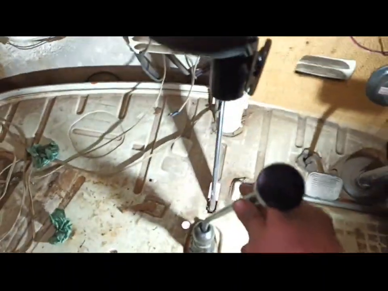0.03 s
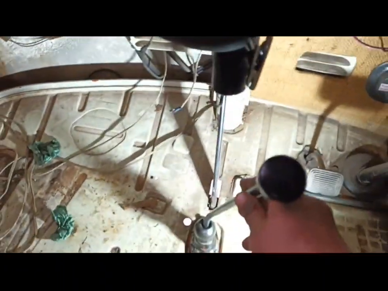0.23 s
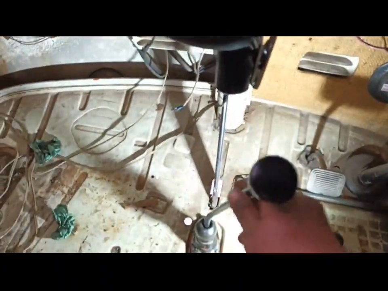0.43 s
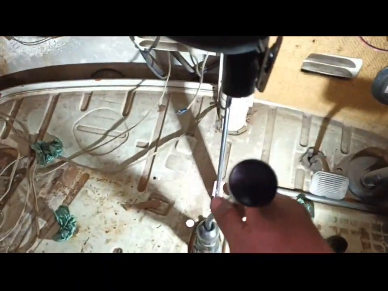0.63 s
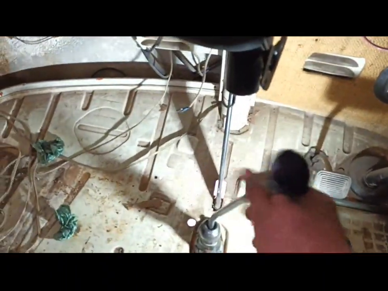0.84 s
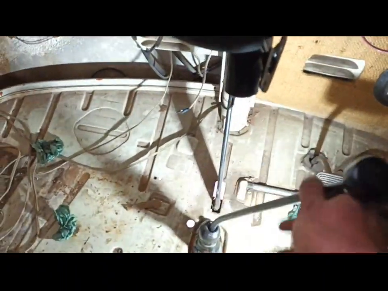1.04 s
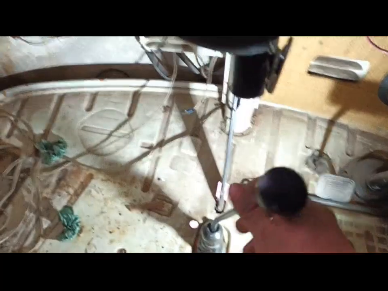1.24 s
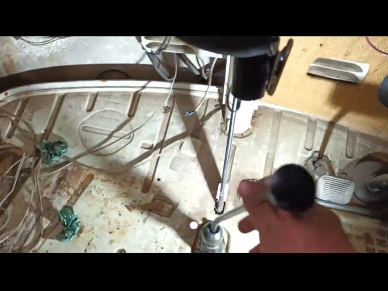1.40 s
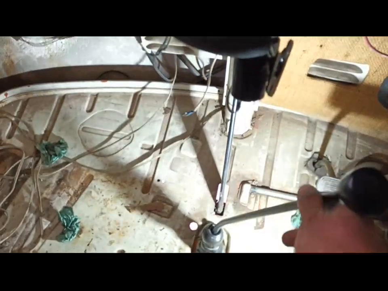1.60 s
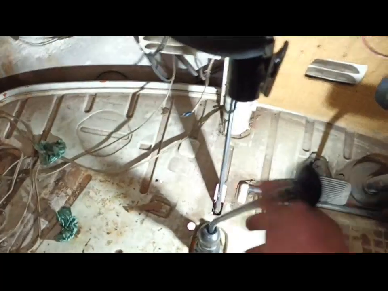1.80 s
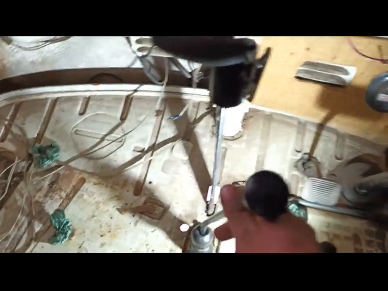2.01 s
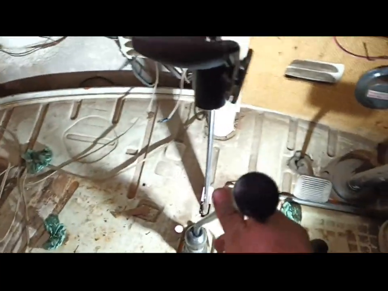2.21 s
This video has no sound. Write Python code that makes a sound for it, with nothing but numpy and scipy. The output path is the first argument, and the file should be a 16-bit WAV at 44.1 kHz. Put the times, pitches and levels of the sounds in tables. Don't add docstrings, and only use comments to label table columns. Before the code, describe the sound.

Hard metallic clunks of a hand-thrown gear shifter, with hollow floor-pan knocks and low body thumps

```python
import sys
import numpy as np
from scipy import signal
from scipy.io import wavfile

SR = 44100
rng = np.random.default_rng(int(sys.argv[2]) if len(sys.argv) > 2 else 0)


def amplitude_ratio(level_db):
    exponent = np.asarray(level_db, float) / 20
    return 10 ** exponent


def wav_out(sig):
    wavfile.write(sys.argv[1], SR, np.round(np.clip(np.atleast_2d(sig).T, -1, 1) * 32767).astype(np.int16))


N = 99269


def in_time(rows):
    return np.interp(np.arange(N) / SR, *np.transpose(rows))


def at_hz(points, hz):
    point_hz, db = np.transpose(points)
    return np.interp(np.log(hz), np.log(point_hz), db)


def band_pass(x, order, low_hz, high_hz):
    return signal.sosfilt(signal.butter(order, [low_hz, high_hz], "band", fs=SR, output="sos"), x)


def ring(push, hz, t60_s):
    radius, turn = amplitude_ratio(-60 / (t60_s * SR)), 2 * np.pi * hz / SR
    feedback = [1, -2 * radius * np.cos(turn), radius * radius]
    return signal.lfilter([0, np.sin(turn)], feedback, push + 1e-18)


def stereo(pair, hz):
    # (frequency [Hz], level [dB])
    side_level = [(60, -34.5), (110, -5), (200, -12.5), (380, -7), (700, -4.5), (1290, 3), (2380, 0),
                  (4400, 1), (8120, -4), (15000, -14)]
    # (frequency [Hz], level [dB])
    lean = [(60, 0), (110, 1), (200, -2), (380, 1.5), (700, -1), (1290, -1.5), (2380, -0.5), (4400, 1.5),
            (8120, 3), (15000, 3.5)]
    signs = np.array([[1], [-1]])
    left_right = pair[0] + amplitude_ratio(at_hz(side_level, hz)) * pair[1] * signs
    return left_right * amplitude_ratio(at_hz(lean, hz) / 2 * signs)


def bands(low_hz, high_hz, gain):
    edges_hz = low_hz * 2 ** np.arange(0, np.log2(high_hz / low_hz) + 0.01, 1 / 5)
    white = rng.standard_normal((2, 2, N + SR // 10))
    out = 0
    for k, (low, high) in enumerate(zip(edges_hz, edges_hz[1:])):
        hz = np.sqrt(low * high)
        noise = band_pass(white[k % 2], 3, low, high)[:, -N:]
        out = out + gain(hz) * stereo(noise, hz)
    return out


def steady(spectrum, low_hz, high_hz):
    x = bands(low_hz, high_hz, lambda hz: amplitude_ratio(at_hz(spectrum, hz)))
    return x / x.std()


def rumble(gate_db):
    # (frequency [Hz], density [dB per Hz])
    spectrum = [(18, -58), (30, -23), (76, -5), (182, -15), (259, -13), (353, -20.5), (385, -17),
                (1000, -34.5), (1300, -64), (2200, -120)]
    level_db, follows = -50, 0.82
    return amplitude_ratio(level_db + follows * gate_db) * steady(spectrum, 30.2, 970)


def hiss():
    # (time [s], level [dB])
    opening = [(0.0, -75.5), (0.01, -80.5), (0.36, -82), (0.41, -62), (0.59, -88), (0.68, -86),
               (0.78, -62.5), (0.91, -66), (1.03, -90), (1.05, -68.5), (1.13, -65), (1.22, -86),
               (1.68, -89), (1.69, -67), (1.94, -80.5), (1.95, -78), (2.0, -89), (2.25, -81.5)]
    # (frequency [Hz], density [dB per Hz])
    spectrum = [(530, -46), (900, 1), (1320, 1), (3700, -3), (4710, -1.5), (8270, -10.5), (10100, 2),
                (13500, -15), (15800, -2.5)]
    level_db = 10
    return amplitude_ratio(in_time(opening) + level_db) * steady(spectrum, 792.6, 17900)


def palm_slides():
    # (time [s], length [s], level [dB])
    slips = [
        (1.335, 0.18, -67),
        (1.635, 0.14, -61.5),
    ]
    # (frequency [Hz], density [dB per Hz])
    spectrum = [(900, 2.5), (8000, -12.5), (10200, -1), (16000, -23)]
    t = np.arange(N) / SR
    swell = 0
    for start_s, length_s, db in slips:
        swell = swell + amplitude_ratio(db) * np.sin(np.pi * np.clip((t - start_s) / length_s, 0, 1)) ** 2
    return swell * steady(spectrum, 1020, 16600)


def shell_boom():
    # (time [s], upper boom level [dB], lower boom level [dB], length [s])
    shoves = [(0.413, -44, -42, 0.034), (0.468, -48, -34.5, 0.054), (0.762, -51, -57, .02),
              (0.796, -21, -35, 0.052), (0.858, -22, -20, 0.024), (1.049, -34, -40.5, 0.024),
              (1.133, -21, -27, 0.01), (1.174, -47, -33, 0.038), (1.473, -31, -52, 0.015),
              (1.545, -39, -49.5, 0.013), (1.689, -29.5, -59, 0.01), (1.775, -27, -27.5, 0.014),
              (2.218, -57, -34, 0.033)]
    # (frequency [Hz], t60 [s], level [dB], shove column driving it [index])
    booms = [(114, .6, 0, 1), (62, .3, 0, 2), (101, .3, -11, 1), (127, .3, -11, 1), (53, .3, -5, 2),
             (82, .25, -8, 2)]
    drive_db, side_db = 9, -5
    t = np.arange(N) / SR
    phase = rng.uniform(0, 2 * np.pi, (len(shoves), len(booms), 2, 1))
    out = 0
    for k, (hz, t60_s, db, column) in enumerate(booms):
        push = np.zeros((2, N))
        for shove, start_phase in zip(shoves, phase):
            start_s, length_s = shove[0], shove[3]
            i = int(start_s * SR)
            u = t[:int(min(length_s * SR, N - start_s * SR))]
            swell = np.sin(np.pi * u / length_s) ** 2 / (length_s * SR)
            wave = np.sin(2 * np.pi * hz * u + start_phase[k])
            push[:, i:i + len(u)] += amplitude_ratio(shove[int(column)] + db + drive_db) * swell * wave
        out = out + stereo(ring(push, hz, t60_s) * amplitude_ratio(np.array([[0], [side_db]])), hz)
    return out


def stop_ticks():
    # (time [s], frequency [Hz], level [dB])
    splashes = [
        (1.318, 2740, -48.5),
        (1.695, 10200, -39),
        (1.736, 4360, -45.5),
        (1.943, 14700, -60),
    ]
    t60_s, half_width_hz = 0.05, 900
    u = np.arange(SR // 10) / SR
    out = np.zeros((2, N))
    for (start_s, hz, db), noise in zip(splashes, rng.standard_normal((len(splashes), 2, len(u)))):
        i = int(start_s * SR)
        burst = noise * amplitude_ratio(db + 9 - 60 * u / t60_s)
        out[:, i:i + len(u)] += stereo(band_pass(burst, 2, hz - half_width_hz, hz + half_width_hz), hz)
    return out


def stop_cracks():
    # (time [s], peak level [dB], extra sizzle near 10 kHz [dB], t60 at 3 kHz [s])
    hits = [(0.401, -38.5, -41, 0.17), (0.72, -52, -6, 0.15), (0.7672, -44, -13, 0.1),
            (0.8127, -18.5, -32, 0.16), (1.0363, -30.5, -22, 0.17), (1.086, -28, -18.5, 0.17),
            (1.1332, -31, -30, 0.18), (1.3187, -29, -64, 0.11), (1.628, -51.5, -15.5, 0.41),
            (1.69, -34, -38, 0.071), (1.696, -20, -20.5, 0.19), (1.884, -45.5, 4, 0.076),
            (1.943, -39.5, -17, 0.19)]
    # (frequency [Hz], density [dB per Hz])
    spectrum = [(530, -29), (900, -3.5), (1300, -9), (2720, -12.5), (7680, -30.5), (9860, -20.5),
                (13400, -38.5), (15500, -52)]
    level_db, t60_slope, rise_s = -6.5 + 15.5, 0.5, 0.00069
    sizzle_hz, sizzle_level_db = 10800, 15.5
    t = np.arange(N) / SR

    def gain(hz):
        out = np.zeros(N)
        sizzle_share = np.clip(np.log2(hz / sizzle_hz) + 1, 0, 1)
        for start_s, db, sizzle_db, t60_s in hits:
            i = int(start_s * SR)
            u = t[:min(SR // 3, N - i)]
            lift_db = (sizzle_db + sizzle_level_db) * sizzle_share
            decay_db = 60 * u / t60_s * (hz / 3000) ** t60_slope
            out[i:i + len(u)] += amplitude_ratio(db + lift_db - decay_db) * np.minimum(u / rise_s, 1)
        return out * amplitude_ratio(level_db + at_hz(spectrum, hz))

    return bands(972.6, 17900, gain)


def rod_slams():
    # (time [s], peak level [dB], frequency [Hz])
    pulses = [
        (1.1518, -16, 450),
        (1.1655, -16.5, 380),
        (1.775, -20, 433),
        (1.7885, -19.5, 355),
    ]
    t = np.arange(N) / SR
    out = np.zeros(N)
    for k, (start_s, db, hz) in enumerate(pulses):
        square = (np.pi * hz * (t - start_s)) ** 2
        out += (-1) ** k * amplitude_ratio(db) * (1 - 2 * square) * np.exp(-square)
    return out


def linkage_rings():
    # (time [s], frequency [Hz], level [dB], t60 [s])
    parts = [(.379, 633, -47.5, 0.054), (.392, 112.9, -37, 0.87), (.406, 246.3, -37, 0.19),
             (.413, 481.3, -41.5, .2), (.413, 656, -36, 0.09), (.402, 1084, -58, 0.19),
             (.718, 819.5, -38, 0.13), (.718, 1113, -39.5, 0.057), (.722, 489, -43.5, 0.29),
             (.767, 633, -27, 0.073), (.79, 610, -37.5, 0.085), (.787, 250, -29, .12),
             (.815, 354.6, -28, 0.18), (.835, 633, -33, 0.1), (.865, 267.2, -25, 0.13),
             (.872, 120, -28, 0.11), (1.039, 537, -28, 0.049), (1.039, 1058, -44, 0.18),
             (1.045, 399.4, -33, 0.14), (1.053, 656.4, -35.5, 0.2), (1.088, 1170, -40, .08),
             (1.09, 307, -30.5, 0.1), (1.112, 255.5, -32, 0.16), (1.11, 677, -35.5, 0.14),
             (1.143, 470, -30, 0.097), (1.152, 634, -28, 0.086), (1.152, 362, -27, 0.11),
             (1.168, 275.5, -33.5, 0.16), (1.168, 721, -34, 0.2), (1.162, 981, -35.5, 0.18),
             (1.195, 430.3, -39.5, 0.26), (1.15, 2240, -66.5, 0.26), (1.333, 637, -34.5, 0.15),
             (1.317, 388, -39.5, 0.2), (1.317, 1054, -46, 0.28), (1.696, 1050, -31.5, 0.13),
             (1.715, 353.8, -25, 0.22), (1.712, 649, -31.5, 0.17), (1.738, 805, -39.5, 0.22),
             (1.77, 264, -28, 0.16), (1.772, 641, -30, 0.16), (1.79, 705, -30.5, 0.13),
             (1.79, 112.6, -37, 0.57), (1.83, 430, -42, 0.33), (1.935, 481, -42, 0.32),
             (2.064, 585, -34.5, 0.076)]
    level_db, side_db, rise_cycles, wobble_rad = 3, -2, 1.2, 0.6
    damping_power = 1.305
    t = np.arange(N) / SR
    out = np.zeros((2, N))
    for (start_s, hz, db, t60_s), phase in zip(parts, rng.uniform(0, 2 * np.pi, (len(parts), 2))):
        i = int(start_s * SR)
        u = t[:int(min(t60_s * SR, N - i))]
        decay = amplitude_ratio(db + level_db - 60 * (u / t60_s) ** damping_power)
        swing = decay * (1 - np.exp(-u * hz / rise_cycles))
        waver = wobble_rad * (np.sin(hz * u / 2 + phase[1]) - np.sin(phase[1]))
        side_phase = phase[0] * np.array([[0], [1]])
        wave = np.sin(2 * np.pi * hz * u + waver + side_phase)
        out[:, i:i + len(u)] += stereo(swing * wave * amplitude_ratio([[0], [side_db]]), hz)
    return out


def hollow_thud(centre_hz, at, touch, sign):
    level_db, cycles = -5.5, 9
    out = 0
    for hz, where, size, way in zip(centre_hz, at, touch, sign):
        push = np.zeros((2, N))
        push[:, where] = amplitude_ratio(level_db) * size * way
        soft_push = ring(push, hz, 5 / hz) * hz * 10 / SR
        out = out + stereo(ring(soft_push, hz, cycles / hz), hz)
    return out


def floor_pan_knocks(touches=8, count=70):
    # (time [s], peak level [dB], colour centre [Hz], chatter length [s])
    knocks = [(0.38, -39.5, 630, 0.0031), (.402, -23, 550, 0.0054), (0.434, -29.5, 458, 0.0066),
              (0.72, -24.5, 886, 0.0077), (0.74, -32, 193, 0.018), (.768, -20, 640, 0.0053),
              (0.794, -17.5, 377, 0.011), (0.818, -11, 320, 0.0069), (.843, -19.5, 458, 0.0082),
              (.879, -20.5, 240, 0.013), (1.037, -19, 544, .012), (1.089, -24, 890, 0.012),
              (1.114, -18.5, 304, 0.013), (1.147, -15, 557, 0.0051), (1.164, -17.5, 422, 0.011),
              (1.317, -16.5, 660, 0.0032), (1.339, -27, 510, 0.0081), (1.449, -28.5, 610, 0.016),
              (1.47, -35, 330, 0.011), (1.633, -27.5, 485, 0.037), (1.694, -14.5, 750, 0.0098),
              (1.708, -12, 366, 0.013), (1.74, -41, 3840, 0.0052), (1.767, -37.5, 4470, 0.0027),
              (1.772, -15, 478, 0.0035), (1.787, -17.5, 369, 0.008), (1.808, -22.5, 604, 0.016),
              (1.841, -33.5, 460, 0.018), (1.941, -32.5, 454, 0.022), (2.059, -32, 607, 0.0099)]
    # (frequency [Hz], level [dB], t60 [s])
    pan_modes = [(152.8, 7, 0.41), (273, -1, 0.037), (250, -13.5, 0.057), (333, -25.5, 0.28),
                 (350.8, 5, 0.094), (398.4, -5, 0.27), (435, -21.5, 0.14), (490.4, -1, 0.097),
                 (580, -7.5, 0.18), (627.7, -1.5, 0.1), (657.2, -0.5, 0.16), (738.5, -3, 0.22),
                 (805, -9.5, 0.26), (1040, -0.5, 0.044)]
    fill_db, fill_db_per_oct, fill_t60_s, fill_t60_slope = -8, -1, 0.25, 0.36
    knock_db, first_touch_db, touch_spread_db = -22, 5, 3
    colour_db_per_oct2, strength_spread_db = 6.5, 3.5
    contact_width = 1.5
    in_step = 0.75

    modes = [*pan_modes]
    for hz in np.geomspace(170, 6000, count) * rng.uniform(0.98, 1.02, count):
        level_db = fill_db + fill_db_per_oct * np.log2(hz / 500)
        modes.append((hz, level_db, fill_t60_s * (500 / hz) ** fill_t60_slope))

    start_s, db, centre_hz, length_s = np.transpose(knocks)[:, :, None]
    step = 2 * np.sort(rng.random((len(start_s), touches)), axis=1)
    step[:, 0] = 0
    at = ((start_s + length_s * step) * SR).astype(int)
    spread_db = touch_spread_db * rng.standard_normal(at.shape)
    touch = amplitude_ratio(db + knock_db - 6.14 * step + np.where(step > 0, spread_db, first_touch_db))

    chance = rng.standard_normal((len(start_s), len(modes), 2, 1 + touches))
    out = 0
    for k, (hz, level_db, t60_s) in enumerate(modes):
        push = np.zeros((2, N))
        colour_db = level_db - colour_db_per_oct2 * np.log2(hz / centre_hz) ** 2
        for c in range(2):
            strength = amplitude_ratio(colour_db + strength_spread_db * chance[:, k, c, :1])
            first_in_mid = 9 * (step == 0) * (c == 0)
            sign = np.sign(chance[:, k, c, 1:] + in_step * chance[:, 0, c, 1:] + first_in_mid)
            np.add.at(push[c], at, touch * strength * sign)
        soft_push = band_pass(push + 1e-18, 2, hz / contact_width, hz * contact_width)
        out = out + stereo(ring(soft_push, hz, t60_s), hz)
    return out + hollow_thud(centre_hz[:, 0], at, touch, np.sign(chance[:, 0, :, 1:]))


def scene():
    # (time [s], level [dB])
    body_gate = [(0, -19), (.37, -20.5), (.385, 1.5), (.51, -6), (.57, -24), (.705, -25), (.716, -1.5),
                 (.95, -10), (1.01, -15), (1.033, -10), (1.036, 3), (1.55, -2.5), (1.595, -31.5),
                 (1.63, -8.5), (1.85, -1.5), (1.99, -15.5), (2.01, -29), (2.25, -14)]
    gate_db = in_time(body_gate)
    background = rumble(gate_db) + hiss()
    body = shell_boom() + stop_cracks() + linkage_rings() + floor_pan_knocks()
    return background + palm_slides() + stop_ticks() + rod_slams() + amplitude_ratio(gate_db) * body


def band_limit(x):
    return signal.sosfilt(signal.butter(12, 16610, fs=SR, output="sos"), x)


def record(dry):
    bass_cut_hz, top_cut_hz = 35.3, 15800
    mix = signal.sosfilt(signal.butter(2, bass_cut_hz, "high", fs=SR, output="sos"), dry)
    mix = signal.sosfilt(signal.ellip(10, 0.5, 70, top_cut_hz, fs=SR, output="sos"), mix)
    return band_limit(mix)


dry = scene()
out = record(dry)
wav_out(out)
```